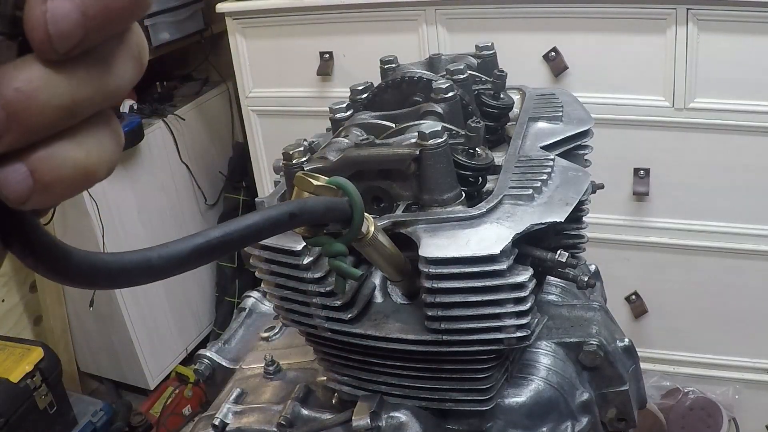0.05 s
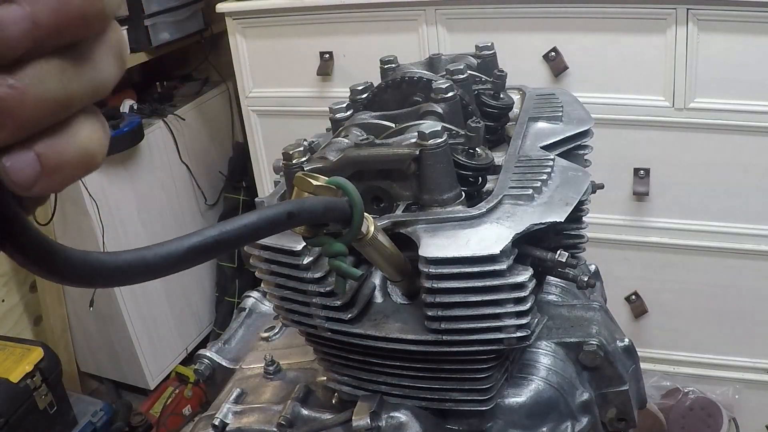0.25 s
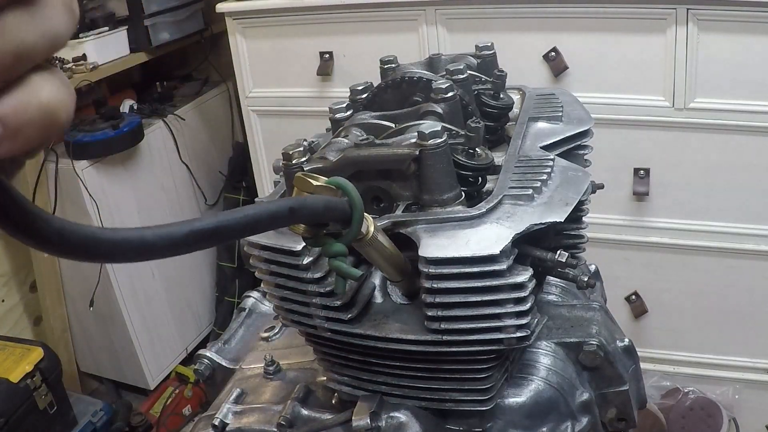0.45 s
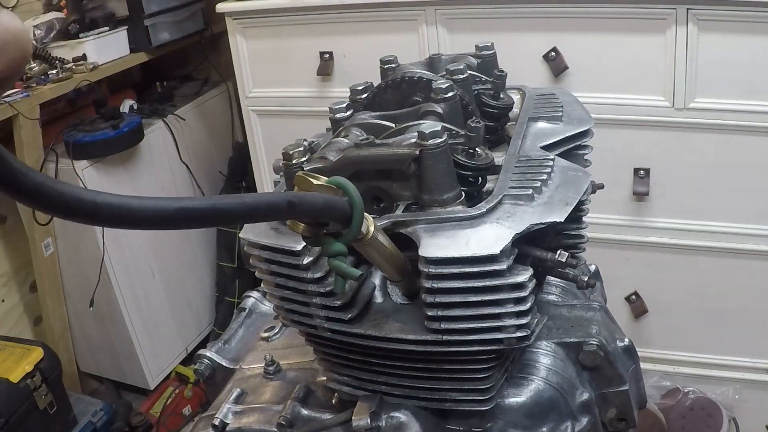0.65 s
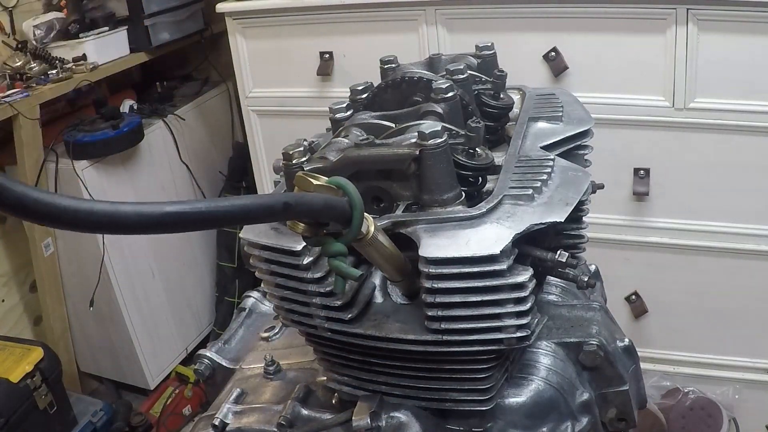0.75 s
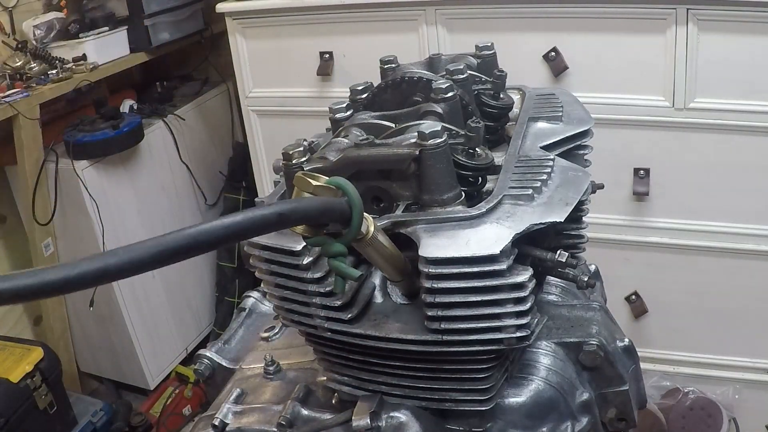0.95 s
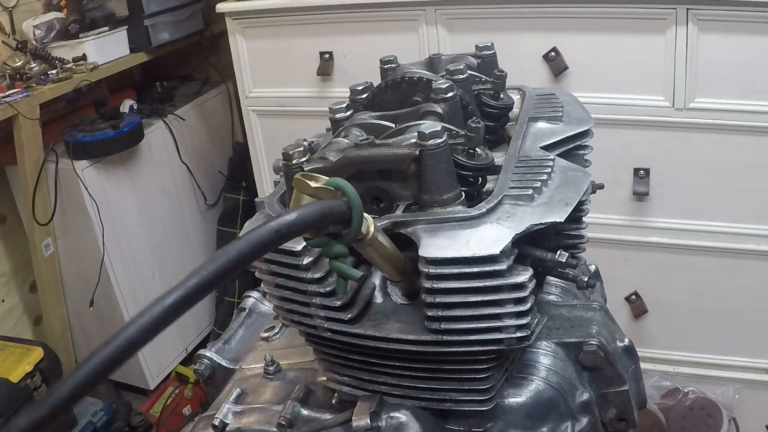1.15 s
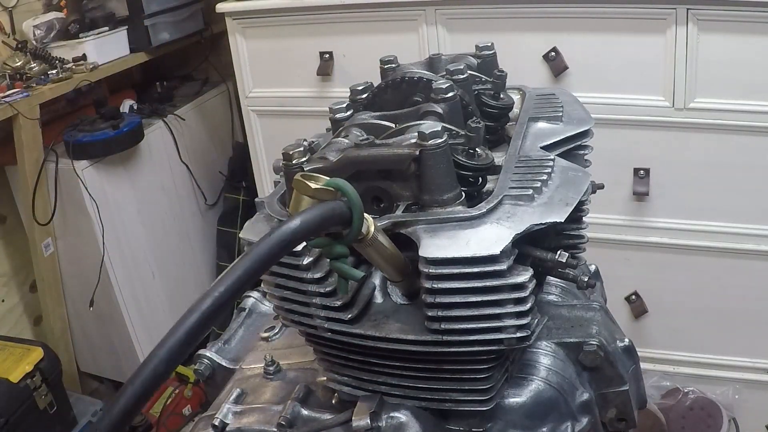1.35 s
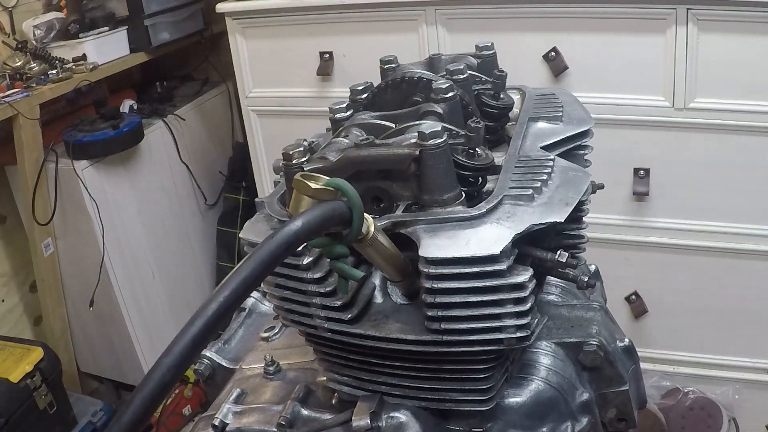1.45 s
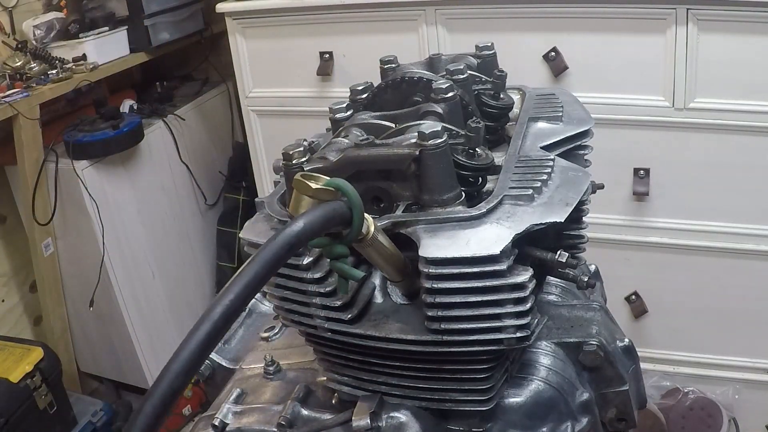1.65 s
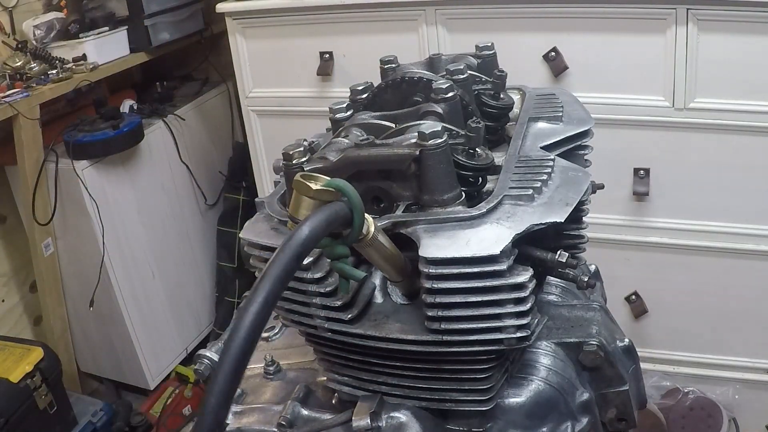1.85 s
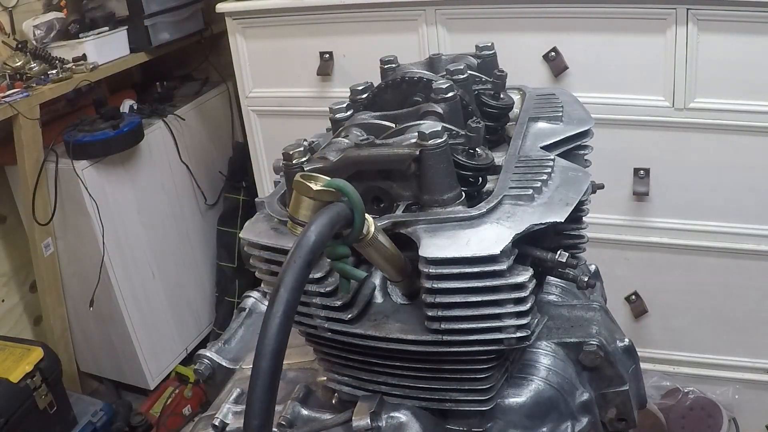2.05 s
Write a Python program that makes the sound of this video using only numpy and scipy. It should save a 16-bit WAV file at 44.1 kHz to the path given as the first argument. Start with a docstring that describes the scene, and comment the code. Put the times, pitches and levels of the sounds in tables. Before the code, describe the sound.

Air bursts from a rubber hose with one quick hissing pop, followed by faint clicks.

```python
"""A rubber hose on an engine's cylinder head is let go in a small garage: the seal seeps for an instant, then the
trapped air escapes with a pop and a short bright puff, and the air in the hose rings low.
The hose swings down with a few faint ticks and a small ping at its brass fitting, over a steady room rumble."""
import sys
import numpy as np
from scipy import signal
from scipy.fft import rfft, irfft, next_fast_len
from scipy.io import wavfile
from scipy.ndimage import map_coordinates

SR = 44100
rng = np.random.default_rng(int(sys.argv[2]) if len(sys.argv) > 2 else 0)


def generate_wav(sig):
    """Save sig (samples, or channels by samples) to the path in sys.argv[1] as 16-bit PCM at SR."""
    pcm = np.round(np.clip(np.atleast_2d(sig).T, -1, 1) * 32767).astype(np.int16)
    wavfile.write(sys.argv[1], SR, pcm)


N = 92610

RELEASE_S = .2238  # the seal opens
# air jet at the opening (Hz, dB per Hz)
JET = [(80, -40), (400, -4.5), (750, -30.5), (1300, -22.5), (2400, -20.5), (3200, -23.5), (4300, -18.5), (4750, -5), (5080, -0.5), (5550, -11), (6200, -18.5), (6900, -29.5), (7600, -23.5), (9000, -17.5), (10200, -18), (11400, -31.5), (12200, -16.5), (13000, -16), (15200, -30)]
JET_DB, JET_ATTACK_S, JET_HOLD_S, JET_T60_S, JET_FLUTTER_DB = -13.5, 0.0018, 0.0077, .11, 2
# the puff as the garage returns it (Hz, dB per Hz)
ECHO = [(80, -36), (400, -24.5), (750, -30.5), (1400, -19), (2200, -16.5), (3100, -14.5), (4200, -6), (5000, -3.5), (5600, -8.5), (6400, -17.5), (7500, -28), (8900, -20.5), (10300, -29), (11400, -29), (12500, -24.5), (14200, -23), (15200, -25.5)]
ECHO_DB, ECHO_DELAY_S, ECHO_ATTACK_S = -14.5, 0.0091, 0.0053
ECHO_T60 = [(300, .17), (1000, 0.13), (2500, .25), (5000, 0.28), (9000, 0.45), (14000, .25)]  # (Hz, t60 s)
ECHO_KNEE_S, ECHO_LATE_DB_PER_S = 0.073, 258  # the tail falls faster after this time
SEEP = [(3500, -34), (4000, -22.5), (4250, -5), (4700, -18.5), (5150, -0.5), (5550, -18), (5930, -4.5), (6300, -61), (7800, -32.5), (8900, -16), (9550, -5), (10300, -24), (11000, -34), (15000, -40.5)]  # (Hz, dB per Hz)
SEEP_DB, SEEP_RISE_DB_PER_S = -28.5, 1051
# crack and low push of the escaping air (delay s, attack s, Hz, peak dB, t60 s)
PUSH = [(0, .0002, 1210, -11.5, 0.0046), (.0001, .0002, 1870, -15.5, 0.0035), (.0012, .001, 201, -7.5, .018)]
# air column and wall of the hose (Hz, peak dB, t60 s)
HOSE = [(155, -26, .14), (317, -19.5, .105), (612, -36, .09)]  # fixed
# ring of the fitting and the cooling fins (Hz, peak dB, t60 s)
METAL = [(2178, -35, .2), (3397, -35, .2), (3975, -32, .2), (4097, -32, .2), (4237, -34, .26), (4315, -30, .26), (4701, -25, .2), (4897, -22, .22), (4997, -22, .2), (5140, -24, .17), (5466, -24, .2)]  # fixed
# ticks of the swinging hose (s, level dB, tilt dB per octave, t60 s)
TICKS = [(0.4042, -49.5, 2, 0.035), (1.9381, -33.5, 0, 0.0073), (1.9487, -41, 1, .012)]
TICK = [(200, -12.5), (700, -10), (1500, -4), (2600, 3.5), (4200, -4.5), (6000, 1.5), (7500, -16), (9300, -6), (11400, -17), (13000, -8), (15000, -33)]  # (Hz, dB per Hz)
TICK_ROOM_DB, TICK_ROOM_T60_S = -1, 0.12
PING = [(4200, -50.5, .06), (5200, -45.5, 0.061), (5700, -49, 0.13), (5790, -47, 0.12), (5880, -52, .08), (13300, -63, .04)]  # (Hz, peak dB, t60 s)
ROOM = [(20, -20), (70, -20), (115, -8.5), (158, 0), (190, -3.5), (220, -1.5), (255, -7.5), (310, -8.5), (350, -12), (440, -14), (600, -17), (750, -20), (1450, -26.5), (2200, -32.5), (3450, -43.5), (4550, -37.5), (5800, -38), (7030, -43), (8500, -39), (10000, -38.5), (12000, -46.5), (14000, -50), (15200, -59)]  # (Hz, dB per Hz)
ROOM_DB = -42
RUMBLE = [(10, -25.5), (20, 5), (35, 4.5), (60, 0.5), (90, -3.5), (120, -12), (170, -35.5), (280, -89.5)]  # (Hz, dB per Hz)
RUMBLE_LEVEL = [(0, -38.5), (.15, -43.5), (.33, -42), (.39, -38), (0.451, -43.5), (0.559, -35.5), (.62, -37.5), (.71, -37.5), (.76, -47.5), (.89, -41), (1.15, -45), (1.35, -47.5), (2.1, -53)]  # (s, dB)
SIDE = [(100, -82), (4000, -55.5), (5500, -42), (8000, -36), (10500, -20.5), (11500, -10), (13000, -3.5), (15000, -6)]  # (Hz, side over mid dB)
LEAN = [(9000, 0), (11500, -3.5), (13000, 3), (15000, 3.5)]  # (Hz, left over right dB)
NOTCH_HZ, NOTCH_WIDTH_HZ, NOTCH_DB = 11200, 260, -11.5
TOP_HZ = 15300  # fixed
HOSE_DB, METAL_DB = 4, 0.5
# faint whistles as the jet dies (s, Hz, width Hz, level dB, length s)
WHISTLES = [(.2985, 8930, 300, -32, .003), (.318, 8600, 200, -44.5, .022), (.295, 12600, 150, -42.5, .018), (.33, 12680, 250, -50, .009)]
KNOCK = [(150, -1), (600, 5), (1200, -4.5), (2000, -16), (2900, -12), (3600, -15), (4030, -6.5), (4500, -20), (6100, -14), (7200, -28), (15000, -40)]  # (Hz, dB per Hz)
SCATTER = [(100, -90.5), (9000, -49.5), (11500, -10), (13000, -13), (15000, -12)]  # (Hz, diffuse side sound in dB)
TICK_ROOM = [(200, -13), (1500, -5), (3400, -11.5), (5200, 1.5), (6200, -5), (7500, -19), (9300, -10), (12000, -18), (15000, -26)]  # (Hz, dB per Hz)
KNOCK_S = .9885  # fixed
KNOCK_DB, KNOCK_ATTACK_S, KNOCK_T60_S = -35, 0.00094, 0.038  # the hose nudges the engine
# soft bumps of the hose (s, peak dB)
BUMPS = [(.088, -31.5), (.989, -40), (1.9396, -32)]
BUMP = [(164, 0.5, 0.086), (247, -1, 0.038)]  # (Hz, dB, t60 s)
SNAP_S = 1.9385  # fixed
SNAP = [(1500, -30.5, 0.0031), (2530, -26, 0.0044), (5100, -32.5, 0.0025), (9300, -35, .004), (13000, -39, 0.0072)]  # the last, dry click (Hz, peak dB, t60 s)
THUD_S = None
THUD = None
PING_S = .858  # fixed
PING_ATTACK_S = 0.0027
LOW_CUT_HZ, LOW_CUT_WIDTH_HZ, LOW_CUT_DB = 400, 55, -10  # fixed


def amp(db):
    """Decibels to gain."""
    return 10 ** (np.asarray(db) / 20)


def unit(x):
    """Scaled to rms 1."""
    return x / np.sqrt(np.mean(x ** 2) + 1e-20)


def along(points, hz):
    """(Hz, value) points read on a log axis."""
    f, v = np.transpose(points)
    return np.interp(np.log(hz + 1), np.log(f + 1), v)


def since(s):
    """Seconds since s, zero before it."""
    return np.maximum(np.arange(N) / SR - s, 0)


def wobble(rate):
    """A smooth random curve, rate knots a second."""
    return map_coordinates(rng.standard_normal(int(N * rate / SR) + 4), [np.arange(N) * rate / SR])


def filtered(x, response):
    """x times a response of frequency."""
    m = next_fast_len(N + SR // 2)
    return irfft(rfft(x, m) * response(np.fft.rfftfreq(m, 1 / SR)), m)[..., :N]


def noise(spectrum, tilt=0):
    """Coloured noise of rms 1, tilted in dB per octave."""
    return unit(filtered(rng.standard_normal(N), lambda hz: amp(along(spectrum, hz) + tilt * np.log2(np.maximum(hz, spectrum[0][0])))))


def burst(s, attack, t60, hold=0):
    """Attack, hold and exponential release."""
    return (1 - np.exp(-since(s) / attack)) * np.exp(-np.log(1000) * since(s + hold) / t60)


def ring(s, modes, attack):
    """Damped modes set off at s."""
    return sum(amp(db) * burst(s, attack, t60) * np.sin(2 * np.pi * hz * since(s)) for hz, db, t60 in modes)


def puff():
    """The seal seeps, then a fluttering jet of air bursts out and dies as the pressure falls."""
    before = RELEASE_S - np.arange(N) / SR
    seep = amp(SEEP_DB - SEEP_RISE_DB_PER_S * np.abs(before)) * noise(SEEP)
    jet = noise(JET) * burst(RELEASE_S, JET_ATTACK_S, JET_T60_S, JET_HOLD_S)
    flutter = wobble(900)  # fixed
    return seep + jet * amp(JET_DB + JET_FLUTTER_DB * flutter)


def echo():
    """The near walls return the puff; each frequency dies at its own speed."""
    start = RELEASE_S + ECHO_DELAY_S
    hz, t, z = signal.stft(noise(ECHO), SR, nperseg=256)
    fade = np.exp(-np.log(1000) * np.maximum(t - start, 0) / along(ECHO_T60, hz)[:, None])
    tail = signal.istft(z * fade, SR, nperseg=256)[1][:N]
    return tail * (1 - np.exp(-since(start) / ECHO_ATTACK_S)) * amp(ECHO_DB - ECHO_LATE_DB_PER_S * since(start + ECHO_KNEE_S))


def pop():
    """The pressure step gives a crack and a low push, and rings the hose and the metal around it."""
    push = sum(ring(RELEASE_S + delay, [mode], attack) for delay, attack, *mode in PUSH)
    hose = amp(HOSE_DB) * ring(RELEASE_S + .004, HOSE, attack=0.0016)
    return push + hose + amp(METAL_DB) * ring(RELEASE_S, METAL, attack=0.0053)


def ticks():
    """Small contacts of the swinging hose, each with a short room tail; the fitting pings once and clicks once."""
    out = ring(PING_S, PING, PING_ATTACK_S) + ring(SNAP_S, SNAP, attack=.0001)
    for s, db, tilt, t60 in TICKS:
        direct = burst(s, 0.00023, t60) * noise(TICK, tilt)
        tail = burst(s, 0.00397, TICK_ROOM_T60_S) * noise(TICK_ROOM) * np.sqrt(t60 / TICK_ROOM_T60_S)
        out = out + amp(db) * (direct + amp(TICK_ROOM_DB) * tail)
    return out


def garage():
    """Steady room noise, and a low rumble that settles as the hose comes to rest."""
    level_db = np.interp(np.arange(N) / SR, *np.transpose(RUMBLE_LEVEL))
    return amp(ROOM_DB) * noise(ROOM) + amp(level_db) * noise(RUMBLE)


def whistles():
    """Narrow bands of the failing jet swell and fade."""
    t, out = np.arange(N) / SR, np.zeros(N)
    for s, hz, width, db, length in WHISTLES:
        band = unit(filtered(rng.standard_normal(N), lambda f: np.exp(-((f - hz) / width) ** 2)))
        out += amp(db) * band * np.exp(-((t - s) / length) ** 2)
    return out


def knock():
    """One dull contact of the rubber, and the low bumps of the hose being handled."""
    bumps = sum(amp(db) * ring(s, BUMP, attack=0.00047) for s, db in BUMPS)
    return bumps + amp(KNOCK_DB) * burst(KNOCK_S, KNOCK_ATTACK_S, KNOCK_T60_S) * noise(KNOCK)


def scene():
    """All sounds meet in the middle. The release has a narrow treble notch and a trough just above the hose's
    main ring; only its top octave spreads."""
    air = filtered(puff() + whistles() + echo(), lambda hz: amp(NOTCH_DB * np.exp(-((hz - NOTCH_HZ) / NOTCH_WIDTH_HZ) ** 2)))
    side = filtered(air, lambda hz: 1j * amp(along(SIDE, hz))) + filtered(echo(), lambda hz: amp(along(SCATTER, hz)))
    pair = filtered(np.array([air + side, air - side]), lambda hz: amp(np.outer([.5, -.5], along(LEAN, hz))))
    release = filtered(pair + pop(), lambda hz: amp(LOW_CUT_DB * np.exp(-((hz - LOW_CUT_HZ) / LOW_CUT_WIDTH_HZ) ** 2)))
    return release + ticks() + knock() + garage()


def record(dry):
    """The camera keeps nothing above its band limit."""
    return filtered(dry, lambda hz: hz < TOP_HZ)


dry = scene()
out = record(dry)
generate_wav(out)
```